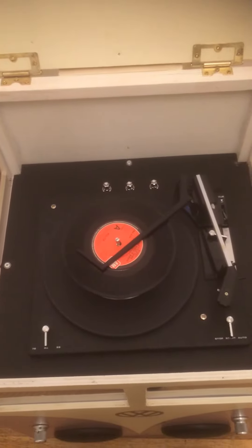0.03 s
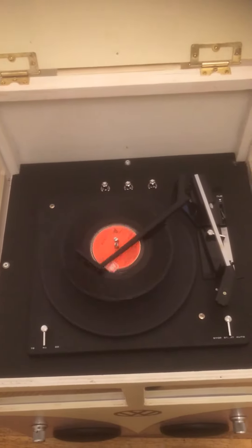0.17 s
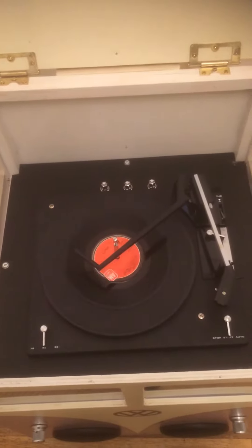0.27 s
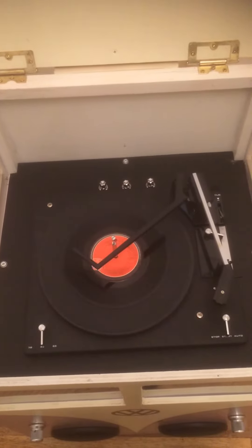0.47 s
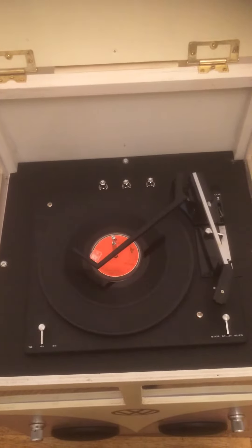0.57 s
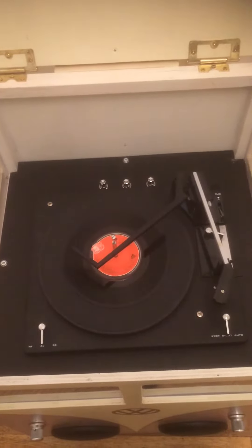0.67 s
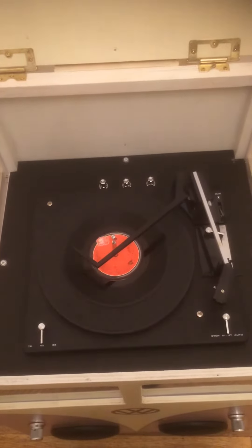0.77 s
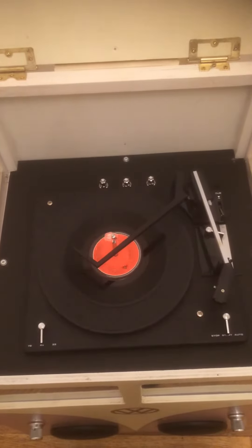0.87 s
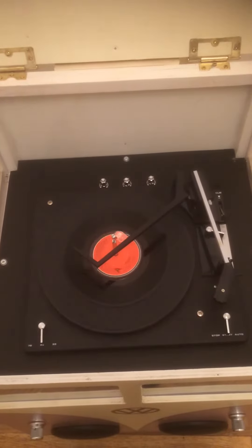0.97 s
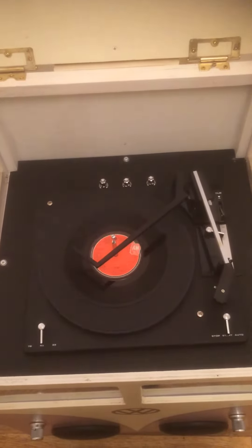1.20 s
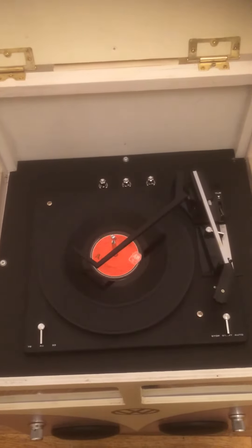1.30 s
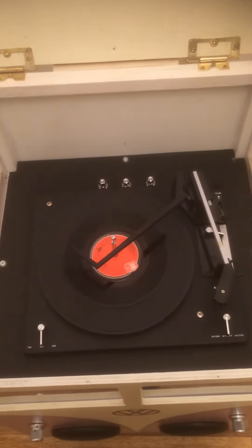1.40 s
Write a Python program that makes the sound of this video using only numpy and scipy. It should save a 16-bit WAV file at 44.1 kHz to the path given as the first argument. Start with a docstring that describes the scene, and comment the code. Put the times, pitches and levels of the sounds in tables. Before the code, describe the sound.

Record changer mechanism clatters: a disc drops with a rattle and thump, then a latch snaps

```python
"""A disc drops with a rattle and a thump, a lever pings, the deck clunks in a quick burst, later a latch snaps.
It is a record changer in a wooden case, heard from close above in a quiet room.
Each blow rings the modes of the struck part and adds a burst of coloured noise; the case booms on low modes.
Faint gear ticks sound over shaped room noise and a wavering motor hum; sparse random echoes make the room."""
import sys
import numpy as np
from scipy import signal
from scipy.io import wavfile
from scipy.ndimage import uniform_filter1d

SR = 44100
rng = np.random.default_rng(int(sys.argv[2]) if len(sys.argv) > 2 else 0)


def int16_out(signal):
    """Quantize to a 16-bit WAV file."""
    q = np.round(np.clip(np.atleast_2d(signal).T, -1, 1) * 32767)
    wavfile.write(sys.argv[1], SR, q.astype(np.int16))


def voltage_ratio(level):
    """Linear amplitude factor for a level in decibels (scalar or array-like)."""
    return 10 ** (np.asarray(level, float) / 20)


N = 63945  # length in samples

# Disc edge meeting spindle and platter. Each row: start in seconds, ring level in dB, crack level in dB.
DISC_LANDINGS = [(.181, -53, -55), (.2115, -75, -40), (.219, -32.5, -31.5), (.2255, -29.5, -28.5),
                 (.2295, -25, -28.5), (.2325, -44, -44.5), (.2395, -32, -43.5), (.247, -30, -43.5),
                 (.2535, -58, -33.5)]
# Ringing modes of the disc. Each row: frequency in Hz, relative level in dB, t60 in seconds.
DISC_MODES = [(517, -10.5, 0.042), (904, -7, 0.076), (1350, 3, 0.026), (1540, 2, 0.017), (1785, -5, 0.033),
              (1988, -2.5, 0.035), (2740, -5.5, 0.035), (3690, -2.5, 0.023), (7110, -0.5, 0.012),
              (8400, -1.5, 0.013)]
# Colour of the disc's crack. Each row: frequency in Hz, relative level in dB.
DISC_CRACK = [(300, -2), (700, -12), (1000, -26), (2000, 2.5), (3350, -6.5), (5300, -6.5), (8360, -12.5),
              (12000, -16.5), (16000, -27)]
# Deck plate struck by the cam. Each row: start in seconds, ring level in dB, crack level in dB.
DECK_CLUNKS = [(.2982, -25.5, -26), (.3045, -28, -27.5), (.3062, -25, -57), (.3098, -22, -32.5),
               (.3145, -31.5, -44), (.3185, -31.5, -44), (.326, -31.5, -66)]
# Ringing modes of the deck plate. Each row: frequency in Hz, relative level in dB, t60 in seconds.
DECK_MODES = [(486, -5, 0.014), (963.4, -3.5, 0.054), (1059, -3.5, 0.028), (1215, 2, 0.04),
              (1294, -3, 0.039), (1426, -10.5, 0.085), (1632, -22, 0.21), (2104, -3.5, 0.028),
              (2490, -15.5, 0.027), (2820, -6.5, 0.022), (3333, -8.5, 0.013)]
# Colour of the deck's crack. Each row: frequency in Hz, relative level in dB.
DECK_CRACK = [(300, -61), (1000, -9), (2000, -10.5), (3000, -3), (4500, -12.5), (9500, -16), (12000, -26),
              (16000, -42)]
# Snaps of the latch. Each row: start in seconds, ring level in dB, crack level in dB.
LATCH_SNAPS = [(1.1605, -49, -62), (1.1632, -35, -30), (1.1652, -34, -25), (1.1685, -34, -32),
               (1.175, -37, -36), (1.183, -40, -41)]
# Ringing modes of the latch. Each row: frequency in Hz, relative level in dB, t60 in seconds.
LATCH_MODES = [(334, -16, 0.046), (865, -14, 0.073), (1190, -14, 0.032), (1510, -10, 0.034),
               (1534, -19.5, 0.17), (1726, -21, 0.19), (1960, -1, 0.025), (2015, -20, 0.2),
               (2497, 1, 0.0099), (2960, -7.5, 0.022), (10310, 0.5, 0.026)]
# Colour of the latch's crack. Each row: frequency in Hz, relative level in dB.
LATCH_CRACK = [(400, -24.5), (900, -14.5), (2000, -9.5), (3300, -17.5), (5500, -12.5), (7200, -14),
               (10200, -13.5), (13000, -14), (16300, -17)]
# Pushes into the wooden case. Each row: start in seconds, level in dB.
CASE_THUMPS = [(0.2176, -33), (0.2241, -28), (0.237, -29), (0.304, -29), (.345, -38), (0.438, -45)]
# Booming modes of the case. Each row: frequency in Hz, relative level in dB, t60 in seconds.
CASE_MODES = [(74, -15, 0.039), (155.1, -1.5, .14), (184.4, -20.5, 0.83), (209, -8.5, 0.18),
              (280, -12, 0.054)]
# Modes of the deck springs. Each row: frequency in Hz, relative level in dB, t60 in seconds.
SPRING_MODES = [(87.5, 7, 0.065), (213, -6, 0.26), (332, -7.5, 0.14)]
# Lever notes. Each row: start in seconds, pitch in Hz, level in dB, t60 in seconds, seconds until caught.
LEVER_PINGS = [(.202, 1250, -50, .11, .005), (.2657, 1303, -21, .11, .016), (.312, 1320, -38, .7, .16)]
# Gear teeth. Each row: start in seconds, ring level in dB, crack level in dB.
GEAR_TICKS = [(.625, -60, -66), (.783, -58, -64), (.858, -60, -64), (.939, -52, -68), (1.382, -59, -51),
              (1.3855, -53, -48)]
# Ringing modes of the gear. Each row: frequency in Hz, relative level in dB, t60 in seconds.
GEAR_MODES = [(1000, -14, .03), (1420, -8, .04), (1690, 0, .045), (1850, -6, .03), (2050, -7, .03)]
# Colour of the gear's crack. Each row: frequency in Hz, relative level in dB.
GEAR_CRACK = [(100, -24), (250, -6), (1000, -5), (1800, -6), (3300, -10), (4500, -24), (9000, -31),
              (14000, -45)]
# Decay of the room by band. Each row: frequency in Hz, t60 in seconds.
ROOM_DECAY = [(100, 0.64), (300, 0.42), (1000, 0.42), (2000, 0.46), (4000, 0.44), (8000, 0.34),
              (14000, 0.26)]
# Colour of the room and microphone noise. Each row: frequency in Hz, relative level in dB.
HUSH_COLOUR = [(12, -66), (20, -19), (150, -6.5), (248, -10), (388, -13.5), (558, -18), (1090, -17),
               (1530, -18.5), (1810, -19.5), (2820, -26), (16000, -34.5)]
# Motor hum. Each row: centre in Hz, rms level in dB, width at half amplitude in Hz.
MOTOR_HUM = [(57.8, -71, 3.3), (158, -74.5, 17)]

MODE_SPREAD = .25  # each blow lands elsewhere: typical shift of a mode, as a share of its width
NUDGE_S, NUDGE_DB, NUDGE_RISE_S = 1.333, -51, 0.0072  # a soft push on the deck springs
PING_RISE_S, PING_STOP_T60_S = .0012, .022  # onset, and the extra damping once caught
ROOM_DB, PING_ROOM_DB = -6.5, -13  # sends to the room from the blows and from the lever
ROOM_GAP_S = 0.0052  # silence before the first echo
TURNS_PER_S = 60  # how often the sound goes round the room tails
HUSH_DB, PATCHY_DB = -65, .6  # noise rms, and the typical size of its drifting patches
MIC_LOW_HZ, EDGE_HZ = 50, 15700  # bass roll-off and top band limit


def evened(x):
    """Scales to rms 1."""
    return x / np.sqrt(np.mean(x ** 2) + 1e-20)


def read(points, hz):
    """Reads a table on a log-frequency axis."""
    f, value = np.transpose(points)
    return np.interp(np.log(hz + 1), np.log(f + 1), value)


def add(mix, s, sound):
    """Mixes a sound in at time s."""
    part = mix[round(s * SR):][:len(sound)]
    part += sound[:len(part)]


def ring(modes, rise_s, shifts=0):
    """Dying sines of one struck object; shifts detune each mode in units of its resonance width."""
    t = np.arange(SR // 2)[:, None] / SR
    hz, db, t60 = np.transpose(modes)
    width_hz = np.log(1000) / np.pi / t60  # a mode that dies faster is broader
    tones = np.sin(2 * np.pi * (hz + shifts * width_hz) * t)
    level = (1 - np.exp(-t / rise_s)) * voltage_ratio(db - 60 * t / t60)
    return (level * tones).sum(1)


def struck(blows, modes, crack, crack_t60, rise_s):
    """Each blow rings the object's modes and adds a dying burst of coloured noise."""
    out, size = np.zeros(N), 4096
    t = np.arange(size) / SR
    rise = 1 - np.exp(-t / rise_s)
    shifts = MODE_SPREAD * rng.standard_normal((len(blows), len(modes)))
    spectrum = np.fft.rfft(rng.standard_normal((len(blows), size)))
    bursts = np.fft.irfft(spectrum * voltage_ratio(read(crack, np.fft.rfftfreq(size, 1 / SR))))
    for (s, ring_db, crack_db), burst, shift in zip(blows, bursts, shifts):
        add(out, s, voltage_ratio(ring_db) * ring(modes, rise_s, shift))
        add(out, s, voltage_ratio(crack_db - 60 * t / crack_t60) * rise * evened(burst))
    return out


def disc():
    """The disc rattles down on spindle and platter, its edge ringing with a soft onset."""
    return struck(DISC_LANDINGS, DISC_MODES, DISC_CRACK, crack_t60=0.06, rise_s=0.0022)


def case():
    """The wooden case booms under each push; the deck springs take a late nudge."""
    out = np.zeros(N)
    for s, db in CASE_THUMPS:
        add(out, s, voltage_ratio(db) * ring(CASE_MODES, rise_s=0.0019))
    add(out, NUDGE_S, voltage_ratio(NUDGE_DB) * ring(SPRING_MODES, NUDGE_RISE_S))
    return out


def lever():
    """A lever rings on one note, then dies much faster once it is caught."""
    out, t = np.zeros(N), np.arange(SR // 4) / SR
    rise = 1 - np.exp(-t / PING_RISE_S)
    for s, hz, db, t60, free_s in LEVER_PINGS:
        caught_s = np.maximum(t - free_s, 0)
        fall_db = -60 * (t / t60 + caught_s / PING_STOP_T60_S)
        add(out, s, voltage_ratio(db + fall_db) * rise * np.sin(2 * np.pi * hz * t))
    return out


def deck():
    """The cam strikes the deck plate in a quick burst of hard clunks."""
    return struck(DECK_CLUNKS, DECK_MODES, DECK_CRACK, crack_t60=0.013, rise_s=0.0003)


def latch():
    """The latch snaps in a tight cluster of blows, each with a sharp onset."""
    return struck(LATCH_SNAPS, LATCH_MODES, LATCH_CRACK, crack_t60=0.037, rise_s=0.0005)


def gear():
    """Gear teeth tick faintly, each a short ring and crack."""
    return struck(GEAR_TICKS, GEAR_MODES, GEAR_CRACK, crack_t60=.03, rise_s=0.001)


def room(x):
    """Three tails of sparse random echoes, each band dying at its own speed; the input goes round them."""
    taps = np.zeros((3, SR))
    at = np.arange(0, SR - 20, 20) + rng.integers(0, 20, (3, (SR - 1) // 20))  # one echo per 20 samples
    echoes = rng.choice([-1., 1.], at.shape) * (at > ROOM_GAP_S * SR)
    np.put_along_axis(taps, at, echoes, 1)
    hz, t, z = signal.stft(taps, SR, nperseg=512)
    decay = voltage_ratio(-60 * t / read(ROOM_DECAY, hz)[:, None])
    tails = signal.istft(z * decay, SR, nperseg=512)[1]
    tails = tails / np.linalg.norm(tails[0])
    # blows a moment apart feed different blends of tails, at constant total power
    turns = TURNS_PER_S * np.arange(N) / SR + np.arange(3)[:, None] / 3
    shares = np.sqrt(2 / 3) * np.cos(np.pi * turns)
    return signal.fftconvolve(x * shares, tails, axes=1)[:, :N].sum(0)


def motor():
    """The motor hum wavers: each line is noise squeezed into a narrow band."""
    out, hz = np.zeros(N), np.fft.rfftfreq(N, 1 / SR)
    for line_hz, db, width in MOTOR_HUM:
        band = 1 / (1 + (2 * (hz - line_hz) / width) ** 2)
        spectrum = np.fft.rfft(rng.standard_normal(N))
        out += voltage_ratio(db) * evened(np.fft.irfft(spectrum * band, N))
    return out


def hush():
    """Room and microphone noise: random spectra, coloured, with patches drifting over time and pitch."""
    frames, hz = N // 256 + 5, np.fft.rfftfreq(1024, 1 / SR)
    a, b, patches = rng.standard_normal((frames, 513, 3)).T
    patches = uniform_filter1d(patches, size=10, axis=0)
    patches = evened(uniform_filter1d(patches, size=10, axis=1))
    z = (a + 1j * b) * voltage_ratio(read(HUSH_COLOUR, hz)[:, None] + PATCHY_DB * patches)
    noise = signal.istft(z, nperseg=1024, noverlap=768)[1][:N]
    return voltage_ratio(HUSH_DB) * evened(noise)


def scene():
    """All parts of the changer, their room tail and the background."""
    hits = disc() + deck() + latch() + gear()
    pings = lever()
    wet = voltage_ratio(ROOM_DB) * hits + voltage_ratio(PING_ROOM_DB) * pings
    return (hits + pings + case() + room(wet) + motor() + hush())[None]


def low_pass(x):
    """Removes everything above the highest recorded frequency."""
    return signal.sosfilt(signal.butter(12, 16810, fs=SR, output="sos"), x)


def record(dry):
    """The microphone rolls off the bass and a steep filter limits the treble."""
    thin = signal.lfilter(*signal.butter(2, MIC_LOW_HZ, "high", fs=SR), dry)
    edge = signal.firwin(255, EDGE_HZ, window=("kaiser", 9), fs=SR)
    limited = signal.oaconvolve(thin, edge[None], "same")
    return low_pass(limited)


dry = scene()
out = record(dry)
int16_out(out)
```